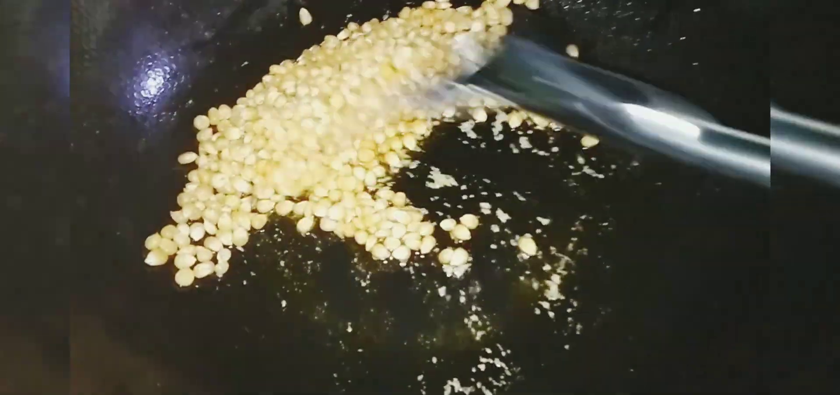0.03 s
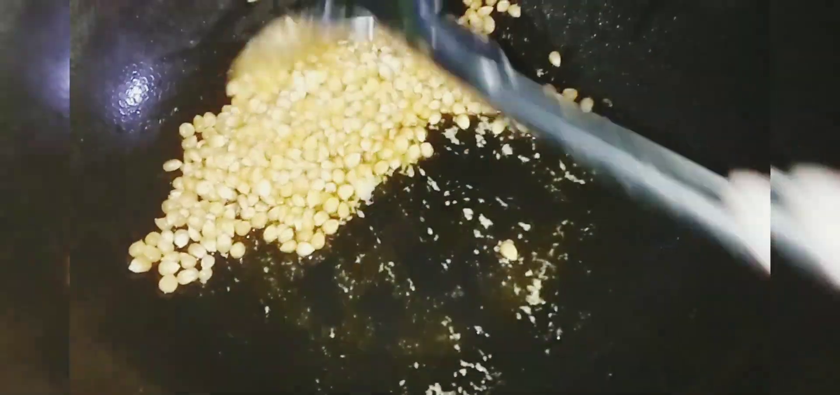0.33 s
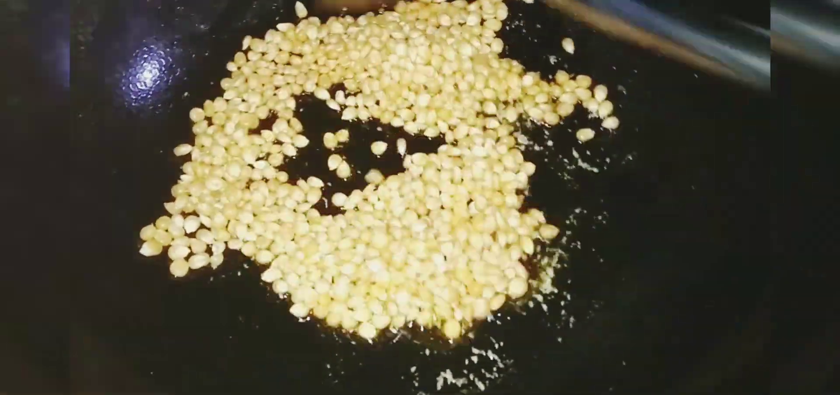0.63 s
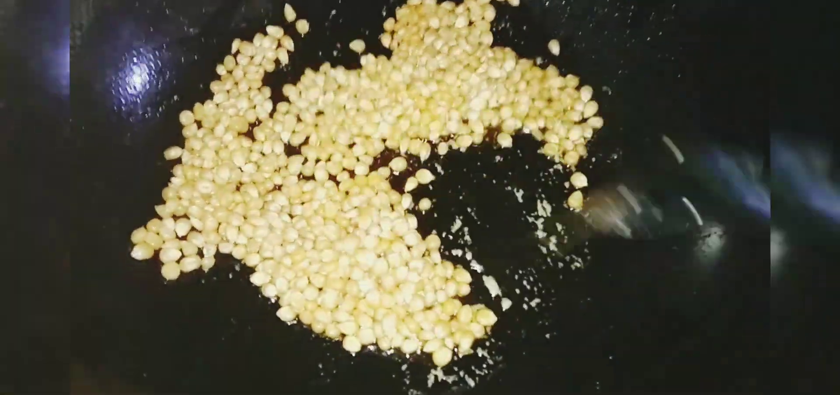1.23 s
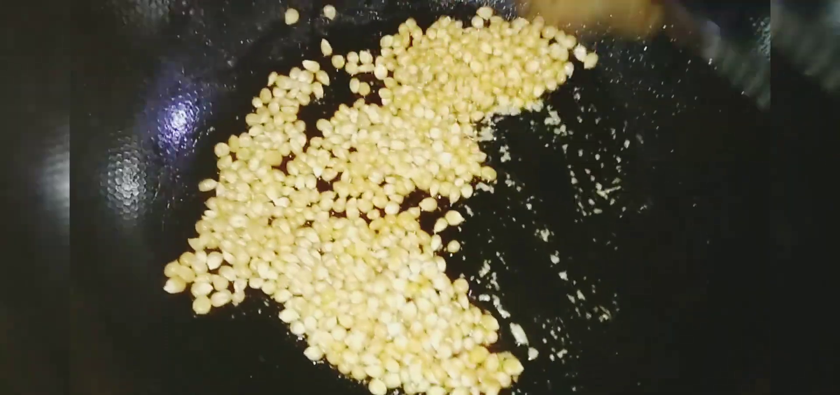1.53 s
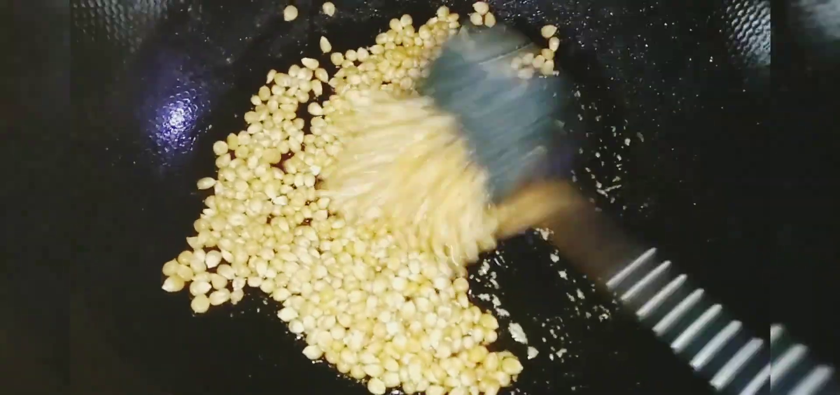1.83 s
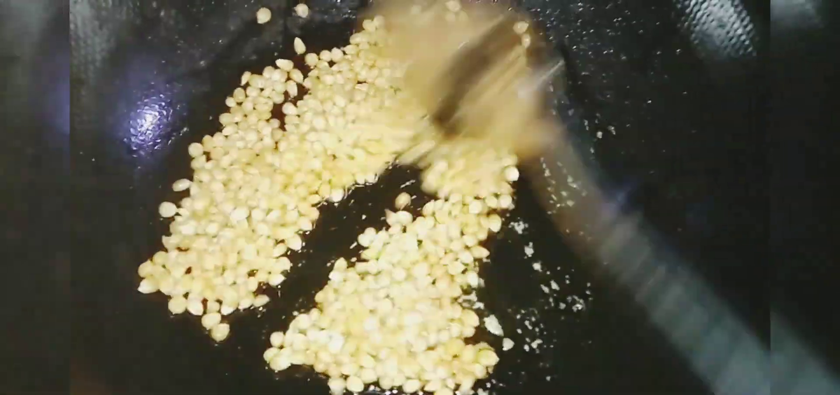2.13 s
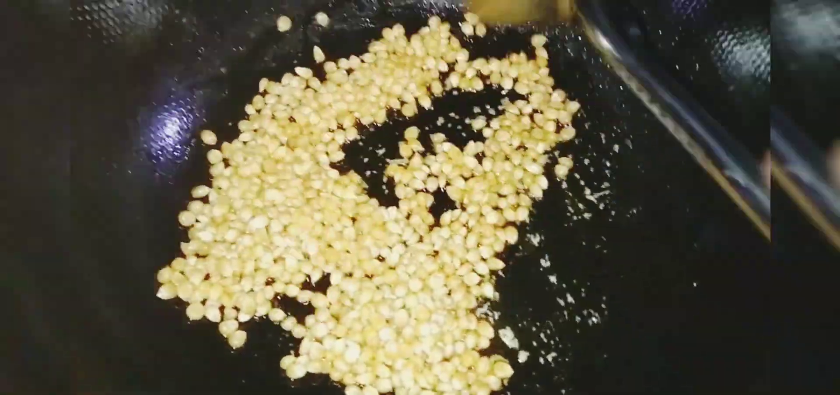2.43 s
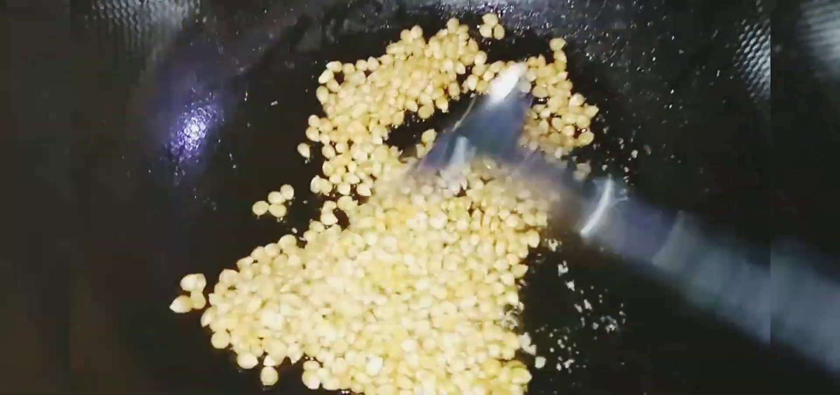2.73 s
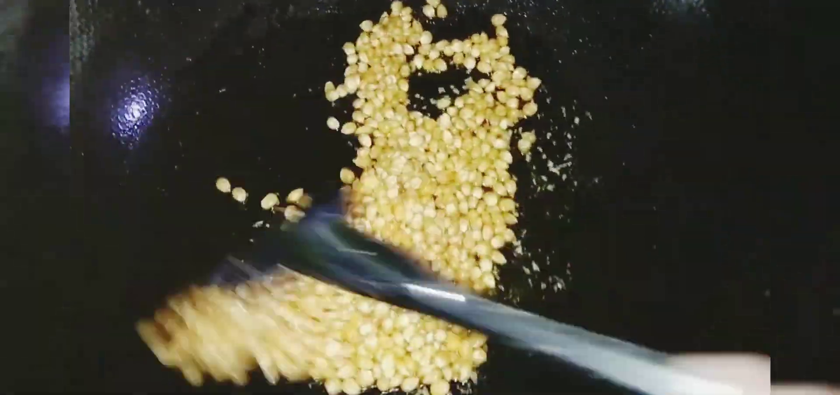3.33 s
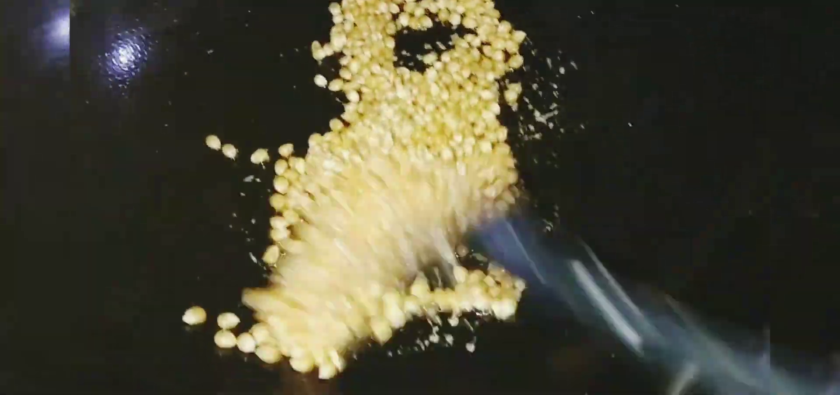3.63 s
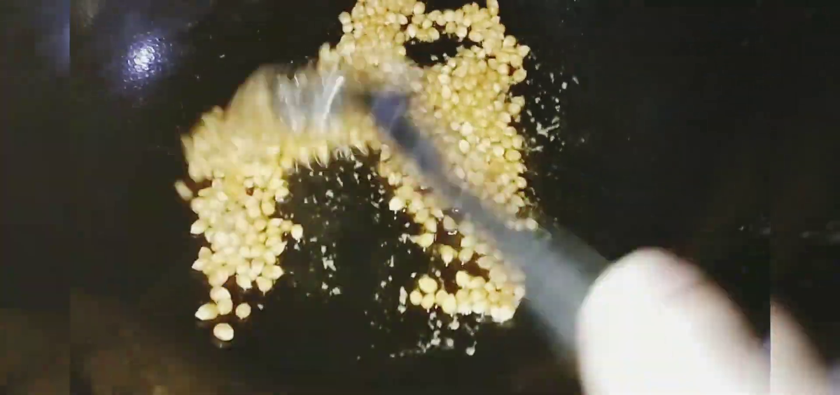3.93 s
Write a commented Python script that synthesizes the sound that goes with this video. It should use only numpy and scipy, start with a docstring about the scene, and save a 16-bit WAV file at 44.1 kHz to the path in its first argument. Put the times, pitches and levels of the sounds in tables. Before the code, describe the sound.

Dry popcorn kernels rattle brightly as a plastic utensil stirs them around a pan, about three strokes a second. The blade scrapes and clacks, sometimes knocking the pan, while loose kernels trickle down. Heard close in a quiet kitchen.

```python
"""A bright, clicking rattle comes about three times a second: dry popcorn kernels stirred in a pan.
Each stroke of a plastic utensil shoves a swarm of kernels while its blade scrapes the pan.
Between strokes the utensil clacks against kernels and knocks on the pan, and now and then
the blade chatters. Loose kernels trickle down the sides. It is all close by, in a quiet kitchen."""
import sys
import numpy as np
from scipy import signal
from scipy.fft import rfft, irfft
from scipy.io import wavfile

SR = 44100
rng = np.random.default_rng(int(sys.argv[2]) if len(sys.argv) > 2 else 0)


def store_wav(level_fs):
    """Save 16-bit WAV to argv[1]."""
    pcm = np.round(np.clip(np.atleast_2d(level_fs), -1, 1) * 32767)
    wavfile.write(sys.argv[1], SR, pcm.T.astype(np.int16))


N = 176400
AGE = np.arange(SR * 3 // 5) / SR  # seconds since one short sound began
PAN_RING_DB = -2.5  # the pan's ring compared with the scrape that sets it off

# stirring strokes (start [s], length [s], rise time [s], rattle [dB], scrape [dB], swell over stroke [dB])
STROKES = [(0.0, 0.031, 0.00053, -29.5, -40.5, -3.5), (0.246, 0.054, 0.0018, -21, -29, -4.5),
           (0.52, 0.16, 0.031, -29.5, -41, -1), (0.82, 0.056, 0.013, -32, -37.5, -10),
           (0.899, 0.07, 0.0006, -30.5, -39.5, -8.5), (1.084, .058, 0.004, -21, -31, 5.5),
           (1.324, 0.065, 0.0021, -21, -29.5, -6), (1.58, 0.098, 0.016, -21.5, -36.5, -4),
           (1.803, 0.12, 0.0064, -19.5, -33.5, -0.5), (1.99, 0.032, .004, -32, -69, -2),
           (2.095, 0.068, 0.001, -26.5, -34, 0), (2.181, 0.061, 0.013, -32, -45.5, 0),
           (2.296, 0.034, 0.0017, -27.5, -30.5, 1), (2.321, 0.057, 0.0017, -19, -41.5, 0.5),
           (2.533, 0.085, 0.0123, -22.5, -37.5, -2.5), (2.611, 0.1, 0.011, -25, -36, 0.5),
           (2.978, 0.11, 0.0034, -25.5, -37, -1.5), (3.268, 0.13, 0.0015, -23, -31.5, -1.5),
           (3.636, 0.049, 0.0016, -27.5, -35, -1), (3.658, 0.067, 0.017, -21.5, -29, -1.5),
           (3.882, 0.074, 0.028, -19, -32.5, 3)]
# tone of the kernels' hard shells (frequency [Hz], level [dB])
SHELL_TONE = [(40, -76), (1500, -10.5), (3300, -11), (4100, 1), (5100, -2), (7100, 1.5), (8300, -0.5),
              (10000, -11), (12500, -23), (15500, -111)]
# tone of the blade rubbing the pan (frequency [Hz], level [dB])
SCRAPE_TONE = [(30, -78), (100, -13), (180, -0.5), (300, -5), (600, -1.5), (1200, 4.5), (2400, 5),
               (4000, 7), (16000, -45.5)]
# tone of the pan under rolling kernels (frequency [Hz], level [dB])
RUMBLE_TONE = [(60, -15), (150, -7.5), (210, 2), (300, -11), (700, -9), (2000, -51)]
# notes the pan rings with (pitch [Hz], level [dB], time to fade by 60 dB [s])
PAN_NOTES = [(209.7, -5.5, 0.24), (446, 0, 0.063), (625, 2, 0.053), (1026, 3.5, 0.048), (1110, -11, 0.086),
             (1619, -3.5, 0.07), (2126, 6.5, 0.031), (2416, 4.5, 0.062), (2580, 2.5, 0.025),
             (2757, 1, 0.045)]


def strokes(settle_s=0.11, rattle_fade_s=0.0087, scrape_fade_s=0.013, rumble_fade_s=0.09, rumble_db=-13):
    """The blade shoves kernels and scrapes the pan, then the heap settles. Gives rattle and pan sound."""
    rattle, pan = np.zeros((2, N))
    shell, blade, bowl = colour(SHELL_TONE), colour(SCRAPE_TONE), colour(RUMBLE_TONE)
    for start, length, rise, rattle_db, scrape_db, swell_db in STROKES:
        swell = undb(swell_db * (np.minimum(AGE / length, 1) - .5))
        push = np.minimum(AGE / rise, 1) * swell
        after = np.maximum(AGE - length, 0)  # seconds since the stroke ended
        settle = push * (after > 0) * np.exp(-after / settle_s)

        shoved = collisions(push * np.exp(-after / rattle_fade_s), per_s=1200, spread_db=3.7)
        settling = undb(-13) * collisions(settle, per_s=350, spread_db=1)
        clicks = kernel_clicks(shoved + settling)
        ringing_shell = shell + undb(-8) * ring(KERNEL_NOTES, vary_db=0, detune=0.061, size=4096)
        add(rattle, start, undb(rattle_db) * shaped(clicks, ringing_shell))

        rubbing = push * np.exp(-after / scrape_fade_s) + undb(-8.5) * settle
        slips = collisions(rubbing, per_s=900, spread_db=6.5)
        scrape = shaped(slips, through(blade, burst(decay_s=0.002)))
        pan_ring = undb(PAN_RING_DB) * shaped(slips, ring(PAN_NOTES))
        add(pan, start, undb(scrape_db) * (scrape + pan_ring) / np.sqrt(2))

        rolls = collisions(push * np.exp(-after / rumble_fade_s), per_s=900, spread_db=6.5)
        add(pan, start, undb(scrape_db + rumble_db) * shaped(rolls, bowl))
    return rattle, pan


# notes of kernels hitting blade and pan (pitch [Hz], level [dB], time to fade by 60 dB [s])
KERNEL_NOTES = [(4250, -13, .011), (6250, -6, .006), (7140, 0, .007), (8060, -8, .009)]


def kernel_clicks(impacts, count=40):
    """Each impact strikes one of many kernels, each with its own brief click and ring."""
    struck = rng.integers(0, count, len(impacts))
    out, hits = np.zeros(len(impacts)), np.flatnonzero(impacts)
    for kernel in range(count):
        click = unit(burst(decay_s=0.0012, size=512) + ring(KERNEL_NOTES, detune=0.09, size=512) / 2)
        for i in hits[struck[hits] == kernel]:
            add(out, i / SR, impacts[i] * click)
    return out


# the utensil hits kernels, or kernels hit the pan (time [s], click [dB], pan [dB], fade time [s])
CLACKS = [(.132, -20.5, -33.5, 0.0086), (0.245, -19, -30, 0.011), (0.316, -19.5, -56, 0.01),
          (0.344, -17, -38.5, 0.0073), (0.437, -24, -55, 0.0073), (0.446, -18.5, -44, 0.015),
          (0.457, -18.5, -53, 0.0071), (.505, -19, -37.5, 0.012), (0.8088, -15.5, -27.5, 0.0057),
          (0.841, -15.5, -33.5, 0.0047), (0.898, -22, -36.5, 0.014), (1.087, -11, -29.5, 0.0082),
          (1.209, -27, -38, 0.0037), (1.236, -27.5, -40, 0.011), (1.297, -22, -35, 0.0015),
          (1.323, -7, -19.5, 0.0026), (1.371, -14, -33, 0.0029), (1.393, -12, -25, 0.0023),
          (1.506, -21.5, -48, 0.0051), (1.521, -19, -50, 0.012), (1.552, -23, -45, 0.0034),
          (1.604, -18.5, -41, 0.01), (1.756, -17.5, -36, 0.0057), (1.809, -12.5, -22.5, 0.0062),
          (2.016, -17, -65, 0.0051), (2.089, -14, -43, 0.0042), (2.101, -12, -20, 0.0048),
          (2.225, -17, -35, 0.0034), (2.25, -19, -59, 0.0076), (2.348, -14.5, -33, 0.0029),
          (2.364, -17.5, -30, 0.0043), (2.403, -19, -54, 0.0054), (2.415, -13.5, -40, 0.0041),
          (2.55, -14.5, -32, 0.0071), (2.619, -18.5, -39, 0.011), (2.69, -18, -31.5, 0.006),
          (2.715, -17, -65, 0.0081), (2.897, -17.5, -44, 0.0039), (2.947, -18.5, -26.5, 0.0078),
          (3.27, -13.5, -22.5, 0.0093), (3.381, -16.5, -39, 0.025), (3.448, -27, -53, .002),
          (3.642, -36, -25, .007), (3.749, -24, -36.5, 0.01), (3.813, -26.5, -39.5, 0.0066),
          (3.876, -12.5, -34, 0.0094)]
# tone of a clack (frequency [Hz], level [dB])
CLACK_TONE = [(40, -75), (1500, -38), (3300, -14), (4200, 0), (5200, -2.5), (7100, 6), (8300, 0),
              (10000, -11), (12500, -24), (15500, -71)]


def clacks():
    """A sharp first contact and a tight bunch of kernel clicks, with some ring from the pan."""
    rattle, pan = np.zeros((2, N))
    shell, blade = colour(CLACK_TONE), colour(SCRAPE_TONE)
    for at, click_db, pan_db, fade_s in CLACKS:
        hit = burst(fade_s) + undb(-14.5) * burst(decay_s=0.0001)
        hit = np.pad(hit, (0, SR // 10))  # leave time to ring
        strength = np.sqrt(fade_s * SR)  # a longer clack carries more energy
        kernel_ring = undb(-12.5) * through(hit, ring(KERNEL_NOTES, vary_db=0.5, detune=0.012))
        add(rattle, at, undb(click_db) * strength * unit(through(hit, shell) + kernel_ring))
        pan_ring = undb(PAN_RING_DB) * through(hit, ring(PAN_NOTES))
        add(pan, at, undb(pan_db) * strength * unit(through(hit, blade) + pan_ring))
    return rattle, pan


# flat knocks of the utensil on the pan (time [s], level [dB])
KNOCKS = [(0.8094, -21.5), (2.947, -17), (3.638, -30)]
# tone of a knock (frequency [Hz], level [dB])
KNOCK_TONE = [(40, -23), (350, -11), (650, 12.5), (1000, 5), (1500, -1), (3500, -6), (6500, 7),
              (15000, -58)]
# thumps as the utensil shoves the pan (time [s], level [dB])
THUMPS = [(1.32, -25)]
# tone of a thump (frequency [Hz], level [dB])
THUMP_TONE = [(25, -12), (60, 17.5), (130, 21), (240, 18), (455, 10), (1080, -18), (3600, -57)]


def knocks(contact_s=0.0039, bounce_s=0.00496, bounce_db=-8, ring_db=-11, thump_s=0.0068):
    """The utensil knocks on the pan and bounces once; a hard shove thumps the whole pan."""
    out, blow = np.zeros(N), colour(KNOCK_TONE)
    for at, db in KNOCKS:
        gain = undb(db) * np.sqrt(contact_s * SR)
        add(out, at, gain * blow)
        add(out, at + bounce_s, gain * undb(bounce_db) * blow)
        add(out, at, gain * undb(ring_db) * ring(PAN_NOTES))
    for at, db in THUMPS:
        add(out, at, undb(db) * np.sqrt(thump_s * SR) * colour(THUMP_TONE))
    return out


# moments when the blade judders on the pan (start [s], length [s], pitch [Hz], level [dB])
CHATTERS = [(0.244, 0.037, 4290, -23), (0.264, 0.044, 592, -35), (1.083, 0.01, 2120, -27),
            (1.338, 0.015, 1460, -27), (1.341, 0.014, 600, -31.5), (1.589, 0.031, 3160, -31.5),
            (1.795, 0.04, 840, -38), (1.79, 0.047, 1320, -32.5), (1.828, 0.083, 7000, -24.5),
            (1.855, 0.072, 449, -37), (2.313, 0.061, 645, -35.5), (2.536, 0.13, 2530, -37.5),
            (2.606, 0.065, 637, -34.5), (2.613, 0.074, 998, -31.5), (2.673, 0.066, 2350, -36.5),
            (3.304, 0.04, 4330, -23), (3.313, 0.075, 1080, -32.5), (3.916, 0.049, 4200, -24.5),
            (3.933, 0.036, 579, -32.5)]


def chatters(waver=0.012, waver_hz=11, ring_cycles=53):
    """The blade sticks and slips on the pan, feeding one note that wavers as the contact moves."""
    out = np.zeros(N)
    for at, length, hz, db in CHATTERS:
        arch = np.sin(np.pi * np.minimum(AGE / length, 1))
        pressure = np.sqrt(np.maximum(arch, 0))
        pitch = hz * (1 + waver * np.sin(2 * np.pi * (waver_hz * AGE + rng.random())))
        wave = np.exp(2j * np.pi * np.cumsum(pitch) / SR)
        slips = collisions(pressure, per_s=1500, spread_db=2)
        note = through(slips / wave, fade(ring_cycles / hz)) * wave  # each slip rings at the moving pitch
        add(out, at, undb(db) * unit(note.real) * np.sqrt(np.sum(pressure ** 2)))
    return out


def trickle():
    """Loose kernels keep sliding down the sides of the pan; single ones tick as they land."""
    slide = undb(-42.5) * collisions(np.ones(N), per_s=650, spread_db=1)
    ticks = undb(-53) * collisions(np.ones(N), per_s=82, spread_db=0)
    return shaped(kernel_clicks(slide + ticks), colour(SHELL_TONE))


def kitchen_echo(x, db, fade_s, delay_s=0.0035):
    """The sound plus its short echo off the kitchen walls."""
    tail = rng.standard_normal(len(AGE)) * fade(fade_s) * (AGE > delay_s)
    return x + undb(db) * through(x, unit(tail))


def kitchen_hiss(db=-58):
    """The kitchen's faint, steady background noise."""
    tone = colour([(20, -30), (1500, 0), (15000, -35)])  # (frequency [Hz], level [dB])
    return undb(db) * through(rng.standard_normal(N), tone)


def collisions(effort, per_s, spread_db):
    """Random impacts, both more frequent and harder where the effort is high."""
    share = effort / effort.max()
    hit = rng.random(len(effort)) < per_s * share / SR
    size = undb(spread_db * np.clip(rng.standard_normal(len(effort)), -2, 2))
    direction = rng.choice([-1, 1], len(effort))
    return unit(hit * size * direction * np.sqrt(share)) * np.sqrt(np.sum(effort ** 2))


def ring(notes, vary_db=3, detune=0.04, size=8192):
    """The fading notes of a struck object; their balance changes with the spot that is hit."""
    out = np.zeros(size)
    for hz, db, fade_s in notes:
        louder, higher, direction = rng.standard_normal(3)
        wave = np.sign(direction) * np.sin(2 * np.pi * hz * (1 + detune * higher) * AGE[:size])
        out += undb(db + vary_db * louder) * unit(wave * fade(fade_s)[:size])
    return unit(out)


def burst(decay_s, size=4096):
    """A crack of noise that dies quickly."""
    return unit(rng.standard_normal(size) * np.exp(-AGE[:size] / decay_s))


def fade(seconds):
    """A level that falls by 60 dB in the given time."""
    return np.exp(-np.log(1000) * AGE / seconds)


def colour(tone, size=4096):
    """A short tap with the given tone; sounds played through it take on that tone."""
    hz, db = np.array(tone).T
    curve_db = np.interp(np.log(np.arange(size // 2 + 1) * SR / size + 1), np.log(hz), db)
    cepstrum = irfft(np.log(undb(curve_db)))
    # folding the second half onto the first packs the tap's energy at its start
    cepstrum[1:size // 2] *= 2
    cepstrum[size // 2 + 1:] = 0
    return unit(irfft(np.exp(rfft(cepstrum))))


def through(x, response):
    """Play a sound through an object, given that object's response to one tap."""
    return signal.fftconvolve(x, response)[:len(x)]


def shaped(x, response):
    """Change a sound's tone but keep its energy."""
    return unit(through(x, response)) * np.sqrt(np.sum(x ** 2))


def undb(db):
    """Turn decibels into a number to multiply by."""
    return 10 ** (np.asarray(db) / 20)


def unit(x):
    """Scale to an energy of one."""
    return x / np.sqrt(np.sum(x ** 2) + 1e-18)


def add(out, at_s, x):
    """Mix a sound in at a time."""
    i = max(int(at_s * SR), 0)
    out[i:i + len(x)] += x[:len(out) - i]


def scene():
    """Kernels and pan in the kitchen, over its faint hiss; the pan gives off little bass."""
    rattle, pan = np.sum([strokes(), clacks()], axis=0)
    bass_cut = signal.butter(4, 140, "high", fs=SR, output="sos")
    pan = signal.sosfilt(bass_cut, pan)
    hiss = kitchen_hiss()
    kernels_in_room = kitchen_echo(rattle + trickle(), db=-10.5, fade_s=0.27)
    pan_in_room = kitchen_echo(pan + knocks() + chatters(), db=-13, fade_s=0.2)
    return (kernels_in_room + pan_in_room + hiss)[None]


def record(dry):
    """Round off the loudest peaks and cut the highest treble."""
    treble_cut = signal.ellip(8, .2, 70, 15500, fs=SR, output="sos")
    return signal.sosfilt(treble_cut, np.tanh(dry))


dry = scene()
out = record(dry)
store_wav(out)
```